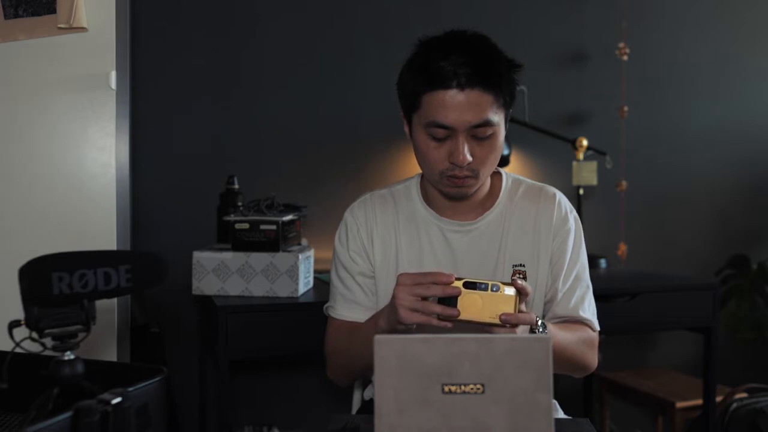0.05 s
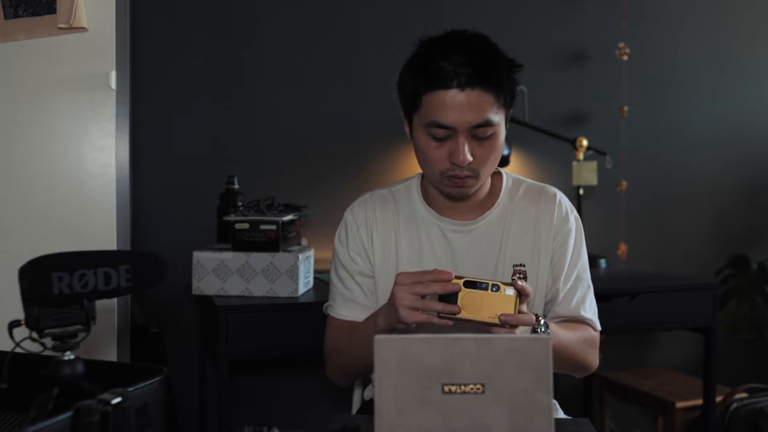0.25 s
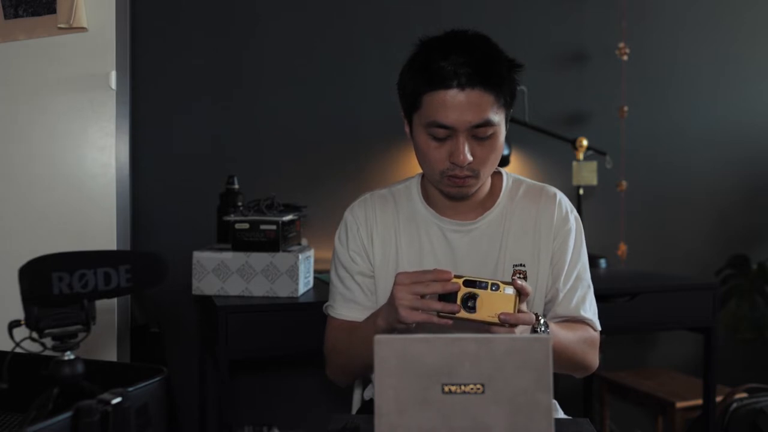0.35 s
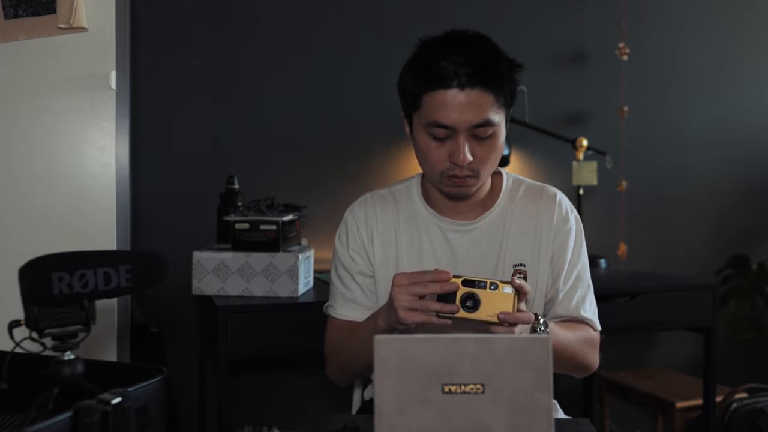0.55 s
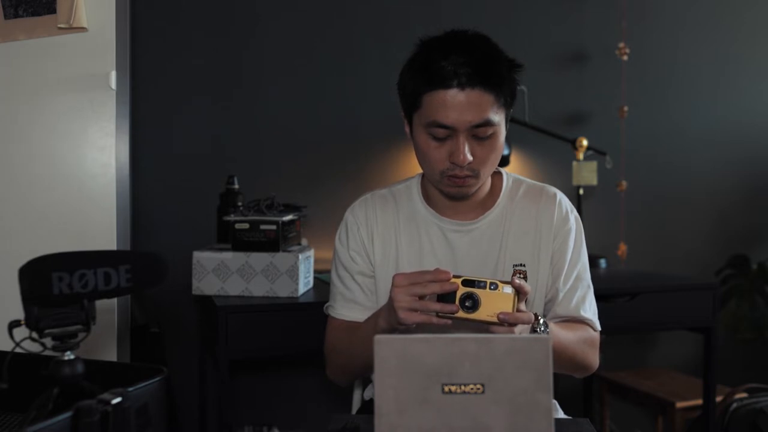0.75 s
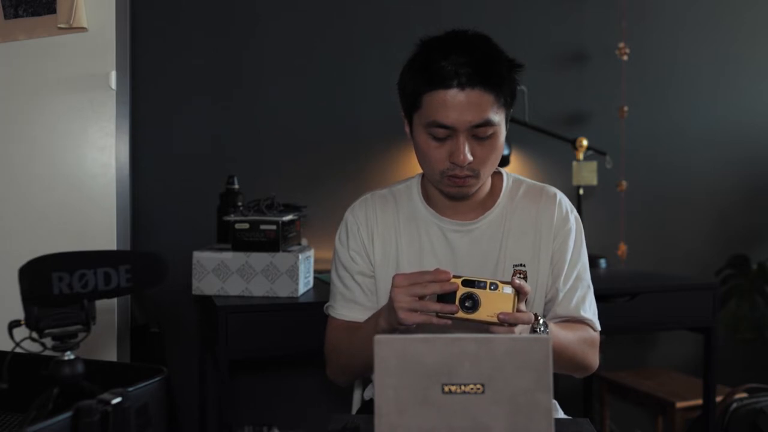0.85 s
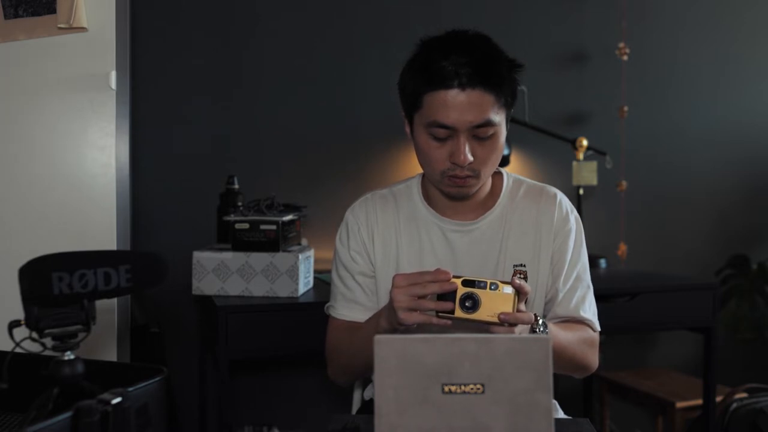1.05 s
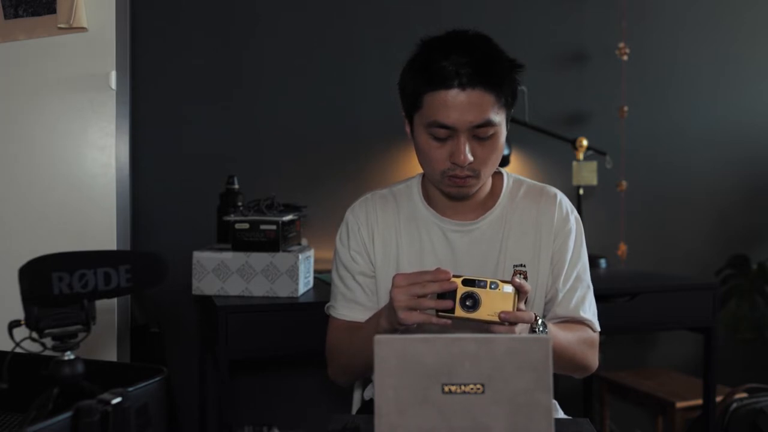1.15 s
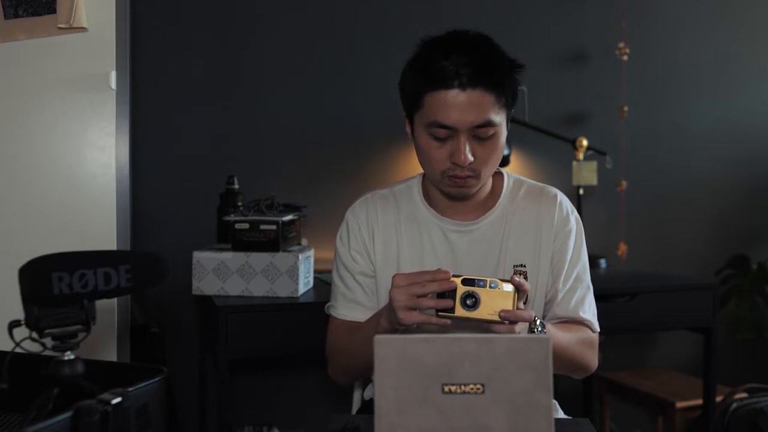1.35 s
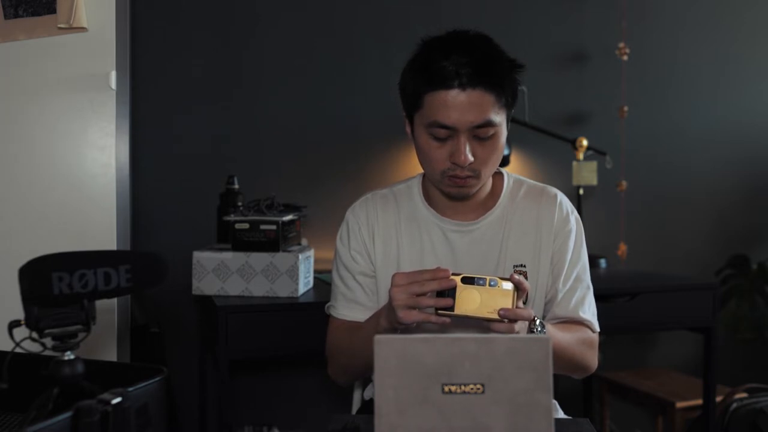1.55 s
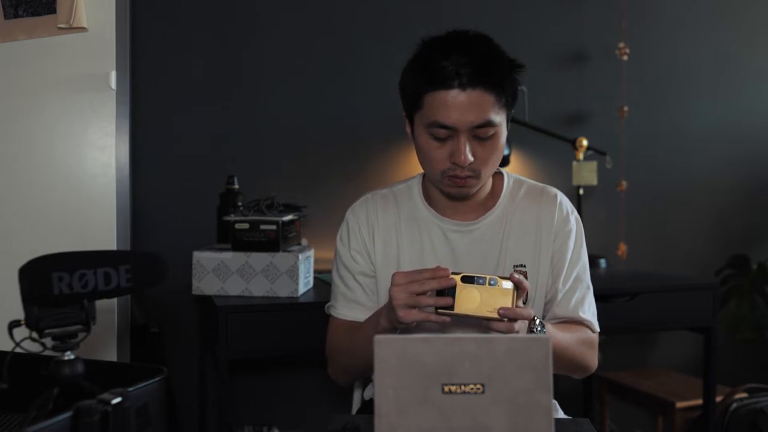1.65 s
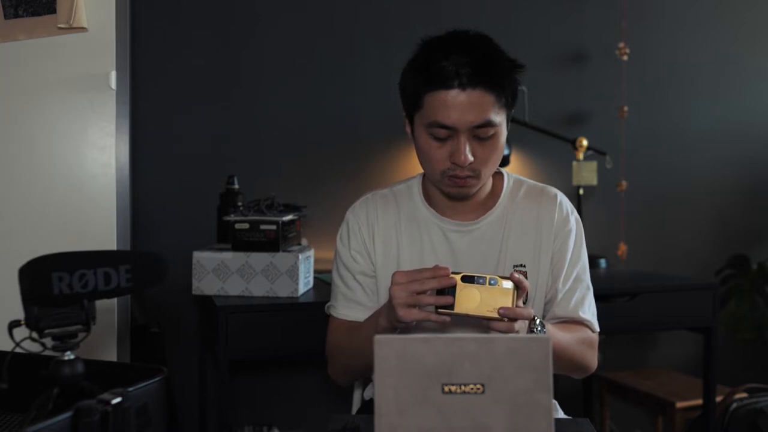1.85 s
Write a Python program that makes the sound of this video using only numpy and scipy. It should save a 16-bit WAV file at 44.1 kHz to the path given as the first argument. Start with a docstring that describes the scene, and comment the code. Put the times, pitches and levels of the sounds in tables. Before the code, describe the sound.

A compact camera's tiny motor whirs its lens out between sharp clicks.

```python
"""Compact camera switching on

Close up in a quiet room, one microphone. The switch slides and clicks, then a tiny motor starts: its gears
tap, rub and whine through the body as they open the cover and push out the lens, slowing under load and
pausing briefly halfway. The lens clatters into its stop; a few ticks and a faint ratcheting follow.
The camera's shell rings with every sound, and the low rumble of the room lies behind it."""
import sys
import numpy as np
from scipy import signal
from scipy.fft import rfft, irfft, next_fast_len
from scipy.io import wavfile

SR = 44100
rng = np.random.default_rng(int(sys.argv[2]) if len(sys.argv) > 2 else 0)


def log_audio(samples):
    """Write samples as a 16-bit WAV file to the path given in sys.argv[1]."""
    # one column per channel
    frames = np.atleast_2d(samples).T
    # limit to full scale, then quantise
    limited = np.clip(frames, -1, 1)
    pcm = np.round(limited * 32767).astype(np.int16)
    wavfile.write(sys.argv[1], SR, pcm)


N = 83790
T = np.arange(N) / SR
TAPS_PER_TURN, GEAR_REDUCTION = 4, 3

# response of the camera body to the gears: (frequency [Hz], gain [dB])
BODY_RESPONSE = [(200, -30), (450, -27.5), (660, -20), (820, -19.5), (1080, -7.5), (1400, -5.5),
                 (1650, -9.5), (2050, -11.5), (3050, -10.5), (3750, 3), (4600, -12.5), (5400, -15.5),
                 (7000, -10.5), (8400, -17.5), (9700, -15.5), (13200, -19.5), (15800, -36)]


def gears():
    """Tooth taps, rubbing and whine follow the motor and sound through the camera body."""
    # motor speed: (time [s], speed [turns/s])
    motor_speed = [(.31, 206.3), (.38, 226.6), (.44, 224), (.49, 246.3), (.54, 282.5), (.58, 294.8),
                   (.70, 286.7), (.79, 285.5), (.82, 267.7), (.85, 236.5), (.90, 209), (.96, 222.5),
                   (1.02, 230.2), (1.06, 272.8), (1.12, 306.1), (1.15, 298.9), (1.20, 291.2), (1.25, 314),
                   (1.30, 338), (1.38, 344.2), (1.46, 323.5), (1.50, 344.4), (1.56, 399.6), (1.62, 378),
                   (1.70, 249)]
    # force on the gears: (time [s], level [dB])
    gear_force = [(.312, -28), (.322, -15.5), (.42, -22), (.60, -20.5), (.82, -21), (.90, -23),
                  (1.015, -21.5), (1.027, -45), (1.037, -23), (1.064, -19.5), (1.08, -39), (1.10, -45),
                  (1.112, -24.5), (1.15, -21.5), (1.36, -19.5), (1.44, -21), (1.58, -20), (1.625, -23),
                  (1.65, -60), (1.71, -47), (1.77, -66), (1.9, -39)]
    # grinding against the whine: (time [s], level [dB])
    grind_level = [(.33, -10), (.5, -0.5), (.8, 0.5), (1.0, 2), (1.2, 0.5), (1.33, -0.5), (1.6, -.5)]
    # treble against the rest of the whirr: (time [s], gain [dB])
    treble_gain = [(.32, 2.5), (.44, 6.5), (.52, 2), (.80, 2), (.90, -7), (1.02, 2.5), (1.04, 5.5),
                   (1.08, 2), (1.15, 5), (1.35, 5.5), (1.55, 4.5), (1.61, 5.5), (1.66, 6), (1.9, -37)]
    speed = in_time(motor_speed) * (1 + .004 * drift(30))
    turns = np.cumsum(speed) / SR
    wheel_db = 1.5 * np.sin(2 * np.pi * turns / GEAR_REDUCTION)  # one swell per turn of the slower wheel
    flutter_db = drift(70.4)
    swing = rms_one(from_db(wheel_db + flutter_db))
    rub = from_db(-1.5) * rng.standard_normal(N)
    taps = from_db(-6) * rms_one(teeth(turns))
    grind = colour(taps + rub, BODY_RESPONSE) * from_db(in_time(grind_level))
    whirr = brighten(swing * (grind + whine(speed, turns)), in_time(treble_gain))
    drive = from_db(in_time(gear_force)) * (T > gear_force[0][0])
    return drive * whirr + swing * squeals(turns)


def teeth(turns, jitter_s=.00006, wear_db=4, spread_db=2.5):
    """One tap per gear tooth; uneven wear repeats with each turn of the slower wheel."""
    tooth = np.arange(1, int(turns[-1] * TAPS_PER_TURN))
    timing, strength = rng.standard_normal((len(tooth), 2)).T
    wheel_teeth = TAPS_PER_TURN * GEAR_REDUCTION
    wear = rms_one(rng.standard_normal(wheel_teeth))[tooth % wheel_teeth]
    times = np.interp(tooth / TAPS_PER_TURN, turns, T) + jitter_s * timing
    samples = np.clip((times * SR).astype(int), 0, N - 1)
    taps = np.zeros(N)
    taps[samples] = from_db(wear_db * wear + spread_db * np.clip(strength, -2, 2))
    return taps - taps.mean()


def whine(speed, turns, gain_db=4.5, waver_db=2.5):
    """Wavering tones at multiples of the motor speed swell as they cross the body's resonances."""
    # gear tones: (multiple of the motor speed, relative level [dB])
    harmonics = [(2, -18), (3, -17), (4, -19.5), (5, -11.5), (7, -14), (8, -10), (11, -17.5), (12, -22),
                 (13, -26), (17, -44), (20, -27)]
    out = 0
    for multiple, db in harmonics:
        body_db = 0.95 * at_hz(BODY_RESPONSE, multiple * speed)
        level = from_db(gain_db + db + body_db + waver_db * drift(5.3))
        out += level * np.sin(2 * np.pi * (multiple * turns + rng.random()))
    return out


def squeals(turns, fade_s=0.051):
    """Single gears squeal roughly for as long as they carry the load."""
    # loaded gears: (start [s], end [s], multiple of the motor speed, level [dB], roughness [rad])
    loaded_gears = [(0.37, 0.519, 8, -32, 0.45), (0.814, 1.04, 8, -37.5, .4), (1.15, 1.254, 8, -36.5, 0.28),
                    (0.955, 1.073, 5, -41, 0.26), (1.16, 1.248, 5, -41, 0.26), (1.245, 1.413, 4, -25, 0.36),
                    (1.447, 1.578, 4, -26.5, 0.65), (0.636, 0.872, 24, -32, 1.8),
                    (1.132, 1.25, 24, -33.5, .7), (1.286, 1.423, 28, -31, .7), (1.304, 1.48, 21, -37, 0.68)]
    out = 0
    for start, end, multiple, db, roughness in loaded_gears:
        envelope = np.clip(np.minimum(T - start, end - T) / fade_s, 0, 1)
        phase = 2 * np.pi * multiple * turns + roughness * drift(114)
        out += from_db(db) * envelope * np.sqrt(2) * np.sin(phase)
    return out


def switch_slide():
    """The switch scrapes softly before it catches."""
    # sliding friction: (time [s], level [dB])
    friction = [(.19, -72), (.205, -45), (.235, -48.5), (.25, -46), (.30, -57), (.32, -60)]
    # spectrum of the scrape: (frequency [Hz], relative level [dB])
    spectrum = [(400, -14), (1300, -8), (2600, -23), (3650, -5), (4700, -12), (9000, -16), (16000, -24)]
    envelope = from_db(in_time(friction)) * (T < friction[-1][0])
    return envelope * colour(rng.standard_normal(N), spectrum)


def clicks_and_chatter(chatter_hz=403.3):
    """Switch and latches click with a short ping; the gears chatter against the end stop."""
    # switch and latch strikes: (time [s], level [dB], decay [s], treble [dB], relative ping level [dB])
    strikes = [(.2399, -4.5, 0.00082, -1.5, -3.5), (0.2637, -22, 0.0079, -3, -13),
               (0.2723, -7, 0.0013, -2.5, -1), (0.2791, -11, 0.0027, -4, -14), (0.313, -7, 0.0013, -1, -9),
               (.3805, -15, 0.0011, -5, -7), (.396, -17.5, 0.0037, 8, -15), (.438, -20, 0.0048, 10, -15),
               (0.846, -26, 0.0027, 14, -18), (1.034, -14, .002, 8, -12), (1.107, -17, 0.0013, 7, -15),
               (1.445, -19, 0.0018, -13, -5), (1.572, -35, .0015, -15, -13), (1.582, -7.5, 0.0028, -8, 0),
               (1.67, -18.5, 0.0018, -5, -17), (1.6887, -15.5, 0.00075, -5, -8),
               (1.7418, -18, 0.0018, -5, -15)]
    # spectrum of these light contacts: (frequency [Hz], relative level [dB])
    spectrum = [(250, -18), (550, -5.5), (1300, -2.5), (1900, -9.5), (2600, -9), (3450, 5.5), (4800, -4),
                (8500, -5.5), (13000, -6), (16000, -17)]
    clicks = pings = 0
    for start, db, decay, treble_db, ping_db in strikes:
        clicks += brighten(contact(start, db, decay), treble_db)
        pings += ring(start, db + ping_db, hz=3370, decay_s=0.0015)
    stop_hits = np.arange(1.5632, 1.586, 1 / chatter_hz)
    chatter = sum(contact(start, db=-10, decay_s=0.0015) for start in stop_hits)
    return colour(clicks + brighten(chatter, db=10), spectrum) + pings


def knocks():
    """The cover and lens barrel knock more heavily, each time with a pitched thud."""
    # impacts: (time [s], level [dB], decay [s], relative thud level [dB], thud pitch [Hz])
    impacts = [(0.355, -8, 0.0059, -18.5, 626), (.360, -16.5, 0.002, -14, 300),
               (0.382, -21, 0.0047, -15.5, 308), (1.5874, -10, 0.0034, -18, 280),
               (1.6278, -9.5, 0.0049, -16, 497), (1.6348, -20, 0.003, -25, 475),
               (1.714, -28, 0.0049, -30, 500), (1.750, -24, 0.0028, -11.5, 533),
               (1.885, -34, 0.0043, -27, 500)]
    # spectrum of the knocks: (frequency [Hz], relative level [dB])
    spectrum = [(120, -12.5), (280, -14), (550, 2), (780, -6), (1150, 8.5), (1700, -2), (3700, 5.5),
                (5200, -6), (9000, -7), (16000, -16)]
    bursts = thuds = 0
    for start, db, decay, thud_db, thud_hz in impacts:
        bursts += contact(start, db, decay)
        thuds += ring(start, db + thud_db, thud_hz, decay_s=0.007)
    return colour(bursts, spectrum) + thuds


def ratchet(rate_hz=73.7):
    """A faint, even run of small contacts once the lens is out."""
    # spectrum of the ticks: (frequency [Hz], relative level [dB])
    spectrum = [(300, -19), (1300, 14), (2500, -6), (3900, 16), (5200, -12), (9000, -30), (16000, -34)]
    ticks = sum(contact(start, db=-30.5, decay_s=0.002) for start in np.arange(1.7732, 1.9, 1 / rate_hz))
    return colour(ticks, spectrum)


def shell(shake):
    """The shell adds its ringing modes to whatever shakes it."""
    # shell modes: (frequency [Hz], gain [dB], time to fall 60 dB [s])
    modes = [(1330.4, 6, 0.1), (2033, 0.5, 0.044), (2520, -2, 0.038), (3805, -11.5, 0.013),
             (4060, -3.5, 0.16)]
    out = shake
    for hz, db, t60 in modes:
        radius = from_db(-60 / (t60 * SR))
        feedforward = np.array([1, 0, -1]) * (1 - radius ** 2) / 2
        feedback = [1, -2 * radius * np.cos(2 * np.pi * hz / SR), radius ** 2]
        out = out + from_db(db) * signal.lfilter(feedforward, feedback, shake)
    return out


def reflections(direct, t60_s=0.42, dull_hz=4940, db=-7):
    """The room returns a short, dull tail that reaches the microphone 4 ms after the direct sound."""
    tail = rng.standard_normal(N) * from_db(-60 * T / t60_s) * (T > .004)
    tail /= np.sqrt(np.sum(tail ** 2))
    tail = signal.sosfilt(signal.butter(1, dull_hz, fs=SR, output="sos"), tail)
    return from_db(db) * signal.fftconvolve(direct, tail)[:N]


def rumble():
    """A low rumble dies away in the opening moments."""
    # fading rumble: (time [s], level [dB])
    fade = [(0, -32.5), (.04, -40), (.07, -48), (.12, -42), (.16, -53), (.24, -93)]
    # spectrum of the rumble: (frequency [Hz], relative level [dB])
    spectrum = [(30, -10), (60, -20), (82, 1.5), (110, -21.5), (200, -19), (450, -30), (1000, -41),
                (4000, -64)]
    return from_db(in_time(fade)) * colour(rng.standard_normal(N), spectrum)


def room_tone():
    """The steady, bass-heavy noise of the quiet room."""
    # room tone at the microphone: (frequency [Hz], relative level [dB])
    spectrum = [(20, -23), (40, -6.5), (60, -1.5), (82, -1), (110, -3.5), (170, -8), (300, -16),
                (600, -20.5), (1500, -25.5), (4000, -28.5), (10000, -33.5), (16000, -33)]
    return from_db(-48) * colour(rng.standard_normal(N), spectrum)


def contact(start, db, decay_s, rise_s=0.0002):
    """A dying burst of tiny collisions."""
    age = np.maximum(T - start, 0)
    envelope = (1 - np.exp(-age / rise_s)) * np.exp(-np.minimum(age / decay_s, 40))
    return from_db(db) * envelope * rng.standard_normal(N)


def ring(start, db, hz, decay_s):
    """One struck, quickly damped mode."""
    age = np.maximum(T - start, 0)
    return from_db(db) * np.sin(2 * np.pi * hz * age) * np.exp(-np.minimum(age / decay_s, 40))


def colour(x, spectrum):
    """Minimum-phase filter with the given spectral shape and unit power gain."""
    size = 2 * next_fast_len(N)
    gain = rms_one(from_db(at_hz(spectrum, np.fft.rfftfreq(size, 1 / SR))))
    cepstrum = irfft(np.log(gain))
    cepstrum[1:size // 2] *= 2  # folded onto positive time, so nothing rings before its strike
    cepstrum[size // 2 + 1:] = 0
    return irfft(rfft(x, size) * np.exp(rfft(cepstrum)))[:N]


def brighten(x, db, crossover_hz=8500):
    """Treble shelf: lifts or lowers the band above the crossover."""
    lowpass = signal.butter(2, crossover_hz, fs=SR, output="sos").repeat(2, axis=0)
    highpass = signal.butter(2, crossover_hz, "high", fs=SR, output="sos").repeat(2, axis=0)
    return signal.sosfilt(lowpass, x) + from_db(db) * signal.sosfilt(highpass, x)


def drift(rate_hz):
    """Smooth random wander of unit power."""
    pole = np.exp(-2 * np.pi * rate_hz / SR)
    wander = signal.lfilter([1], [1, -2 * pole, pole ** 2], rng.standard_normal(N + SR))
    return rms_one(wander[SR:])


def in_time(rows):
    """A control curve at every sample."""
    return np.interp(T, *np.transpose(rows))


def at_hz(spectrum, hz):
    """A spectrum's level in dB, read on a log-frequency axis."""
    frequencies, db = np.transpose(spectrum)
    return np.interp(np.log(np.maximum(hz, 1)), np.log(frequencies), db)


def from_db(db):
    """Decibels to gain."""
    return 10 ** (np.asarray(db) / 20)


def rms_one(x):
    """Scale to unit power."""
    return x / np.sqrt(np.mean(x ** 2) + 1e-20)


def scene():
    """The camera close to the microphone with the room behind it, in mono."""
    mechanism = gears() + switch_slide() + clicks_and_chatter() + knocks() + ratchet()
    camera = from_db(-1.5) * shell(mechanism)
    background = room_tone() + rumble()
    return (camera + reflections(camera) + background)[None]


def record(dry):
    """The recorder rounds the highest peaks and cuts the top of the treble."""
    ceiling, cutoff_hz = .9, 17000
    rounded = ceiling * np.tanh(dry / ceiling)
    return signal.sosfilt(signal.cheby2(16, 60, cutoff_hz, fs=SR, output="sos"), rounded)


dry = scene()
out = record(dry)
log_audio(out)
```